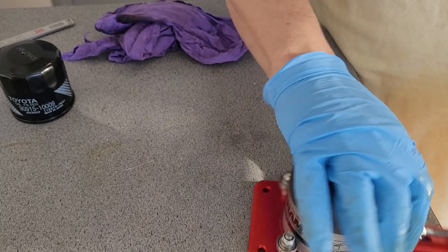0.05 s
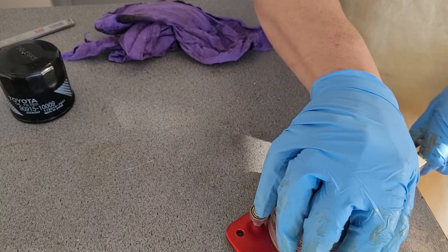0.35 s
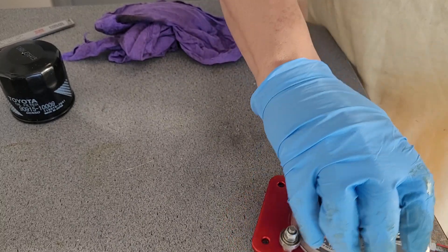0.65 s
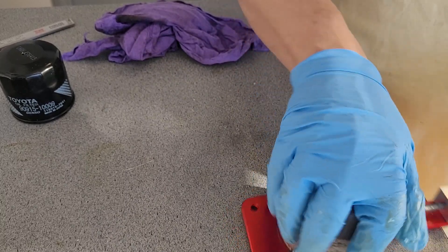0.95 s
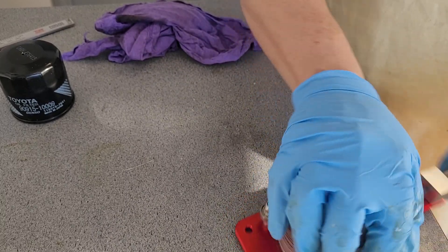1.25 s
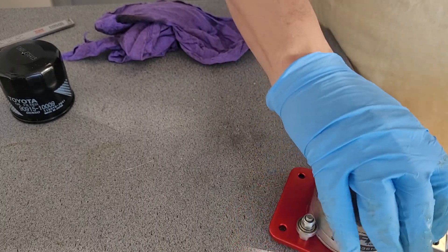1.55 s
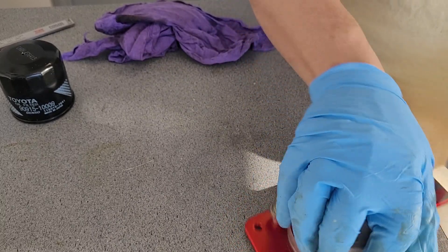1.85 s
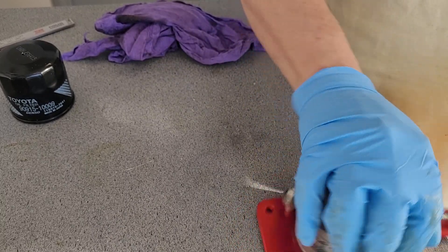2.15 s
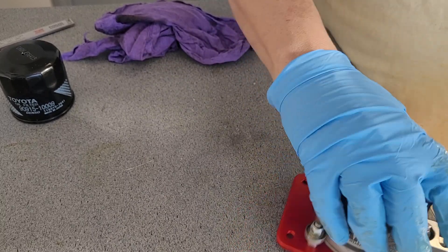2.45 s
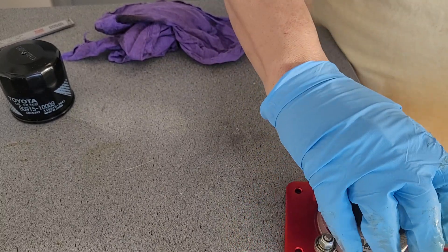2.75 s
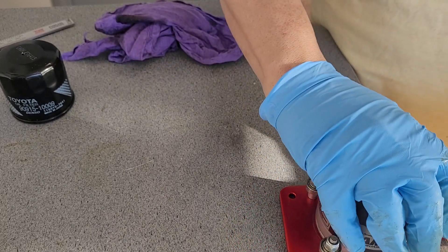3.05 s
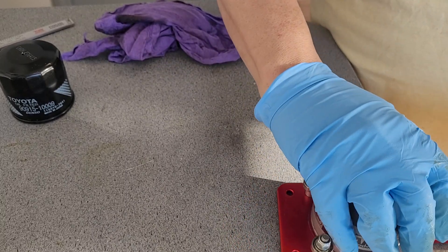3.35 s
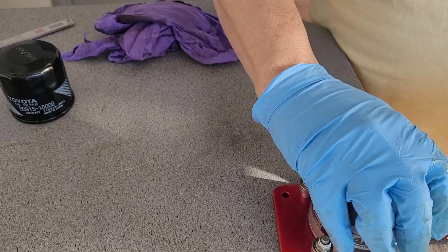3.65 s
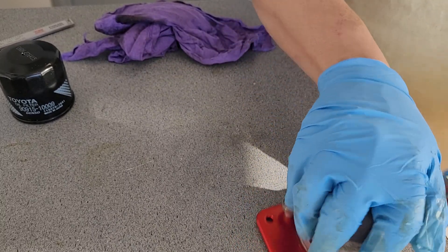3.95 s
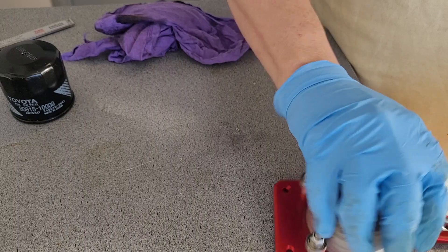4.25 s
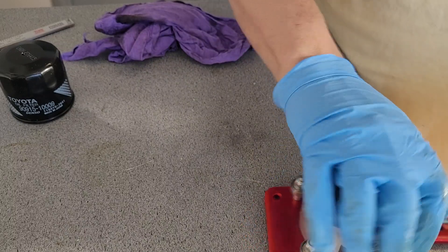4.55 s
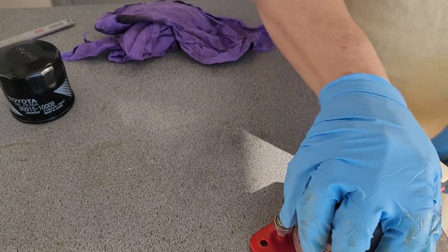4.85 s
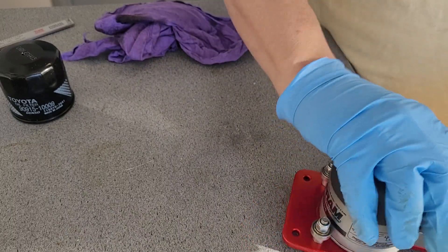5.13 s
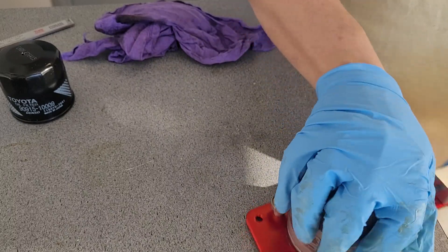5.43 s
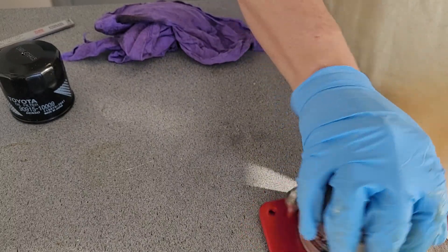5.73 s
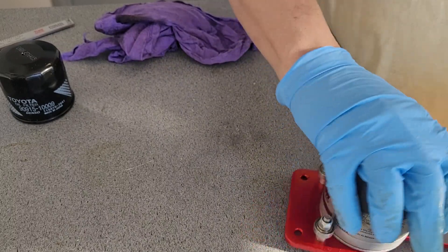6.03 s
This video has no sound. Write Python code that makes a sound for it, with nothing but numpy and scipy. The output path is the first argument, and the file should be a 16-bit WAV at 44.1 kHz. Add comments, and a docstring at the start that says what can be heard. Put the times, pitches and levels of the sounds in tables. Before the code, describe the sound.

From the start, a steel oil filter is twisted against a cutting wheel about twice a second, close by in a small workshop. Each twist makes a short gritty rumble with a light scrape, and the cutter's metal base knocks unevenly on the bench several times a second. Between twists a rubber glove slides back over the can with a dry hiss. A sharp steel tick stands out at about 0.4 seconds, and the hollow can clacks at 0.8. Tiny, faint squeaks come near 0.2, 1.7 and 2.1 seconds. Around 2.7 seconds the turning pauses, leaving a few knocks and a soft, low thud of the hand at 3.2. At about 3.8 the twisting, hissing and knocking resume, with clacks and ticks near 4.4 and 5.4, continuing until about 6 seconds. A faint, steady room hush lies underneath.

```python
"""Oil filter cutter on a workbench

Close up in a small workshop, on a stereo pair: a gloved hand turns a steel oil filter against a
cutter's wheel. Each twist rolls the can with a gritty rumble and rocks the cutter's base, which knocks
on the bench. Between twists the glove hisses back over the can. Loose steel ticks, the can clacks
against the rollers, the wheel squeaks, and once the heel of the hand lands with a soft thud."""
import sys
import numpy as np
from scipy import signal
from scipy.io import wavfile

SR = 44100
rng = np.random.default_rng(int(sys.argv[2]) if len(sys.argv) > 2 else 0)


def transcribe(signal):
    """Save signal, clipped to [-1, 1], as a 16-bit WAV file at the path in sys.argv[1]."""
    frames = np.atleast_2d(signal).T
    limited = np.clip(frames, -1, 1)
    pcm = np.round(limited * 32767).astype(np.int16)
    wavfile.write(sys.argv[1], SR, pcm)


N = 268569


def from_db(db):
    return 10 ** (np.asarray(db) / 20)


def rms_one(x):
    return x / np.sqrt(np.mean(x ** 2) + 1e-20)


def delayed(x, seconds):
    return np.roll(x, round(seconds * SR))


def at_hz(points, hz):
    """The columns of a table, read at one frequency."""
    freqs, *columns = np.transpose(points)
    return [np.interp(np.log(hz), np.log(freqs), c) for c in columns]


def butter(x, hz, kind, order=2):
    sos = signal.butter(order, np.minimum(hz, .48 * SR), kind, fs=SR, output="sos")
    return signal.sosfilt(sos, x + 1e-18)


def drift(per_s):
    """A random wander: straight lines between knots of spread 1."""
    knots = rng.standard_normal(4096)
    return np.interp(np.arange(N) / SR * per_s, np.arange(len(knots)), knots)


def swell(top_s, rise_s, fall_s):
    """One stroke speeding up and slowing down: a lopsided bell of height 1."""
    grid = np.arange(0, N, 32)
    t = grid / SR - top_s
    bell = np.exp(-.5 * (t / np.where(t < 0, rise_s, fall_s)) ** 2)
    return np.interp(np.arange(N), grid, bell)


def ring(hz, db, t60, apart_hz=700, contact_cycles=0.12):
    """One blow on a set of modes; the higher a mode, the more its phase differs left to right."""
    t = np.arange(int(min(t60.max(), .18) * SR))[:, None] / SR
    build_up = 1 - np.exp(-t * hz / contact_cycles)   # the contact lasts part of a cycle
    envelope = from_db(db - 60 * t / t60) * build_up
    phase = (-1) ** np.arange(len(hz)) * hz / (hz + apart_hz)
    return np.array([-(envelope * np.sin(2 * np.pi * hz * t + side * phase)).sum(1) for side in (1, -1)])


def strike(times, strengths_db, modes, detune=0.04):
    """Blows (rows) on modes (columns); the hand's changing grip shifts the modes from blow to blow."""
    hz, db, t60 = np.transpose(modes)
    shifts = np.exp(detune * rng.standard_normal(strengths_db.shape))
    out = np.zeros((2, N + SR))
    for start_s, strength, shift in zip(times, strengths_db, shifts):
        blow = ring(hz * shift, db + strength, t60)
        at = round(start_s * SR)
        out[:, at:at + blow.shape[1]] += blow
    return out[:, :N]


def cracks(times, db, decay_s):
    """Short bursts of noise as two rough faces meet."""
    impulses = np.zeros(N)
    impulses[np.round(times * SR).astype(int)] = from_db(db)
    envelope = signal.lfilter([1], [1, -np.exp(-1 / (decay_s * SR))], impulses + 1e-18)
    return envelope * rng.standard_normal((2, N))


# How alike diffuse sound is at the two microphones: freq_hz, correlation
MIC_LIKENESS = [(60, 0.97), (150, 0.89), (300, 0.37), (640, 0.67), (1400, 0.028), (3000, 0), (16000, 0.047)]
def diffuse_bands(size):
    """Third-octave bands of stereo noise, alike in the bass and unrelated in the treble: (hz, noise)."""
    edges = 28 * 2 ** (np.arange(29) / 3)
    white = rng.standard_normal((2, 2, size + 4000))   # extra samples let the filters settle
    for k, band in enumerate(zip(edges, edges[1:])):
        hz = np.sqrt(band[0] * band[1])
        mid, side = butter(white[k % 2], band, "band")[:, -size:]
        alike = at_hz(MIC_LIKENESS, hz)[0]
        yield hz, np.sqrt((1 + alike) / 2) * mid + np.sqrt((1 - alike) / 2) * side * [[1], [-1]]


def coloured(spectrum, flicker_db=0, flicker_per_s=30):
    """Diffuse noise of a given colour and rms 1; each band can flicker by itself."""
    noise = 0
    for hz, band in diffuse_bands(N):
        flicker = flicker_db * drift(flicker_per_s) if flicker_db else 0
        noise = noise + from_db(at_hz(spectrum, hz)[0] + flicker) * band
    return rms_one(noise)


# Room tone, all around the microphones: freq_hz, density_db
AIR_COLOUR = [(30, -24), (60, -21), (120, -13), (250, -7), (500, -15.5), (1000, -25), (2400, -26.5),
              (5000, -36), (16000, -36.5)]
def room_tone(level_db=-60):
    """The workshop's faint, steady, low rush."""
    return from_db(level_db) * coloured(AIR_COLOUR)


# The small workshop, heard from the bench: freq_hz, level_db, t60_s
ROOM_DECAY = [(59.7, 5.5, 0.71), (134, 5, 0.41), (244, -3.5, 0.36), (515, -3, 0.39), (1120, -4.5, 0.59),
              (2310, -5, 0.36), (4900, -2, 0.36), (8900, 2, 0.36), (15600, -4, 0.24)]
def reflections(x, wet_db=-33, build_s=0.0047, early_db=4, early_s=0.013):
    """Dense early reflections off the bench and body, then a tail that dies band by band."""
    t = np.arange(SR // 2) / SR
    tail = 0
    for hz, band in diffuse_bands(len(t)):
        db, t60 = at_hz(ROOM_DECAY, hz)
        tail = tail + band * from_db(db - 60 * t / t60)
    early_lift = 1 + from_db(early_db) * np.exp(-t / early_s)
    response = tail * (1 - np.exp(-t / build_s)) * early_lift
    return from_db(wet_db) * signal.fftconvolve(x[None], response, axes=1)[:, :N]


# Small squeaks where the wheel meets the can: peak_s, level_db
WHEEL_SQUEAKS = [(0.249, -41), (1.66, -43), (2.132, -37)]
def squeaks(hz=2550, width=0.082, rise_s=0.0017, fall_s=0.0044):
    """The wheel sticks for an instant and sets a narrow resonance of the can's wall chirping."""
    chirp = rms_one(butter(rng.standard_normal((2, N)), [hz / (1 + width), hz * (1 + width)], "band"))
    return chirp * sum(from_db(db) * swell(peak_s, rise_s, fall_s) for peak_s, db in WHEEL_SQUEAKS)


# Hiss of rubber on the can: freq_hz, density_db
GLOVE_COLOUR = [(300, -49), (1000, -12.5), (1900, -4), (3000, -2), (4200, 0.5), (4650, 3.5), (5400, -2.5),
                (7200, -1.5), (8200, -2.5), (9600, -7), (12000, 1), (15500, -8)]
# The glove sliding back, close and dry: top_speed_s, slowing_s, level_db
GLOVE_SLIDES = [(0.064, 0.058, -31.5), (0.507, 0.092, -33), (1.028, 0.057, -34.5), (1.49, 0.056, -32.5),
                (1.95, 0.058, -32), (2.428, .055, -32), (2.809, 0.11, -55), (4.058, 0.07, -34.5),
                (4.572, 0.053, -33), (5.058, 0.063, -33), (5.544, 0.058, -34), (5.998, 0.051, -33.5)]
def glove(hiss_db=-2.0, flutter_db=0.94, drag_db=-10, echo_db=-15, echo_s=0.00072, travel=0.284,
          rise_share=0.59):
    """Thin rubber slips over painted steel and drags the can; a reflection off the bench, its path changing as
    the hand moves, echoes the hiss."""
    speed = sum(from_db(db) * swell(top_s, rise_share * fall_s, fall_s)
                for top_s, fall_s, db in GLOVE_SLIDES)
    hiss = coloured(GLOVE_COLOUR)
    n = np.arange(N)
    lag = echo_s * SR * np.exp(travel * drift(5))
    bench_echo = from_db(echo_db) * np.array([np.interp(n - lag, n, side) for side in hiss])
    hiss_gain = from_db(hiss_db + flutter_db * drift(110))
    drag = from_db(drag_db) * coloured(GRIT_COLOUR)
    return speed * (hiss_gain * (hiss + bench_echo) + drag)


# Modes of the hollow can: pitch_hz, level_db, t60_s
CAN_MODES = [(536, -2, 0.044), (616, -15, 0.029), (806, 4.5, 0.037), (974, -7, 0.043), (1052, 4, 0.031),
             (1345, 9, 0.019), (1690, 0.5, 0.009)]
# The can dropping in the cutter: start_s, level_db
CAN_DROPS = [(0.8366, -32.5), (1.803, -37.5), (2.268, -37.5), (4.3915, -26.5), (4.409, -32),
             (5.3732, -30.5)]
def clacks(scatter_db=2):
    """The hollow can jumps in its seat and drops against the rollers."""
    times, db = np.transpose(CAN_DROPS)
    scatter = scatter_db * rng.standard_normal((len(times), len(CAN_MODES)))
    return strike(times, db[:, None] + scatter, CAN_MODES)


# Modes of the small steel parts: pitch_hz, level_db, t60_s
STEEL_MODES = [(3530, 9, 0.0028), (4130, 14.5, 0.0039), (5540, 7, 0.003), (6300, 0.5, 0.0075),
               (7480, 5, 0.0041), (12900, 8.5, 0.002), (14100, 0, 0.0015), (15000, -3, 0.0027)]
# Metal ticking on metal, near the microphones: start_s, level_db
LOOSE_TICKS = [(.336, -26.5), (.427, -36), (0.4408, -15.5), (0.4419, -13.5), (.83, -32), (1.201, -35),
               (1.299, -33), (1.805, -29), (2.131, -32), (3.2194, -26.5), (4.407, -28), (5.393, -33.5)]
def ticks(ring_db=-9, scatter_db=1.5, crack_db=-2, crack_s=0.0019, jolt_db=-18, jolt_scatter_db=4.3):
    """Loose steel ticks by itself and when a knock jolts it: a short crack and a brief ring."""
    jolts = [(s, db + jolt_db + jolt_scatter_db * rng.standard_normal()) for s, db in BASE_KNOCKS]
    times, db = np.vstack([LOOSE_TICKS, jolts]).T
    scatter = scatter_db * rng.standard_normal((len(times), len(STEEL_MODES)))
    rings = strike(times, db[:, None] + ring_db + scatter, STEEL_MODES)
    return rings + butter(cracks(times, db + crack_db, crack_s), 1300, "high")


# Gritty rumble through the bench: freq_hz, density_db
GRIT_COLOUR = [(35, -18), (65, 0), (100, -7.5), (190, -19), (260, 1), (400, -7.5), (600, -11.5), (900, -17),
               (1400, -21.5), (2400, -18.5), (5000, -45)]
# Steel scraping at the wheel: freq_hz, density_db
SCRAPE_COLOUR = [(500, -7), (1400, -30), (2400, -4), (3400, -5), (4700, 0), (7000, -5.5), (9500, -9),
                 (12500, -2.5), (16000, -10)]
# Twists of the can, close up: top_speed_s, slowing_s, effort_db, pitch_hz
CAN_TWISTS = [(0.319, 0.07, -42, 416), (.815, 0.051, -37.5, 342), (1.261, 0.075, -47.5, 396),
              (1.81, 0.14, -44.5, 780), (2.22, 0.053, -38, 422), (2.5, 0.075, -43.5, 280),
              (3.84, 0.086, -43.5, 338), (4.351, 0.079, -40, 307), (4.821, 0.065, -45.5, 320),
              (5.32, 0.084, -41.5, 328), (5.79, 0.083, -40.5, 325)]
def rolling(burrs_per_s=600, size_db=3.0, judder_db=3, grind_db=-2, grit_db=-2, rasp_db=2.5, width=0.25,
            scrape_db=-50, scrape_follows=0.26):
    """The wheel rides over burrs in its groove: the can grinds, the bench rumbles, the steel scrapes."""
    sizes = from_db(size_db * np.minimum(rng.exponential(1, N), 4)) * rng.choice([-1, 1], N)
    burrs = sizes * (rng.random(N) < burrs_per_s / SR)
    usual_db = np.array(CAN_TWISTS)[:, 2].mean()
    grind = push = rub = 0
    for top_s, fall_s, effort_db, hz in CAN_TWISTS:
        speed = swell(top_s, fall_s, fall_s)
        resonance = rms_one(butter(burrs, [hz / (1 + width), hz * (1 + width)], "band"))
        grind = grind + speed * from_db(effort_db) * resonance
        push = push + speed * from_db(effort_db)
        rub = rub + speed * from_db(scrape_db + scrape_follows * (effort_db - usual_db))
    rumble = from_db(grind_db) * grind + from_db(grit_db) * push * coloured(GRIT_COLOUR)
    scrape = rub * from_db(rasp_db * drift(300)) * coloured(SCRAPE_COLOUR, flicker_db=3.5)
    return rumble * from_db(judder_db * drift(45)) + scrape


# Modes of cutter and bench together, for the thud and the knocks: pitch_hz, level_db, t60_s
BENCH_MODES = [(61, -8, 0.093), (74.8, -5.5, 0.17), (105, -8, 0.12), (138, -14, 0.15), (156.7, -7, 0.088),
               (197, -23, 0.013), (255, -3.5, 0.074), (273, -2, 0.2), (350, -4, 0.075), (408, -2.5, 0.058),
               (414, 4, 0.027), (574.4, 7.5, 0.022), (709, 2, 0.025), (811, -17, 0.085), (967, -9.5, 0.06),
               (1280, -22, 0.082), (1363, 3, 0.016), (1712, -4.5, 0.045), (2005, 2, 0.012),
               (2154, -11, 0.035), (2382, 0.5, 0.017), (2580, -11, 0.017), (4110, -2, 0.0061),
               (4830, -28, 0.0038), (7000, -34.5, 0.013)]
def thud(start_s=3.24, level_db=-7, softness_db_per_octave=5.0, damped_t60_s=0.082, soft_hz=520,
         count=13):
    """The heel of the hand lands softly on the cutter: it sways and damps the bench's low modes."""
    pivot_hz = BENCH_MODES[1][0]
    modes = [(hz, db - softness_db_per_octave * np.log2(hz / pivot_hz), min(t60, damped_t60_s))
             for hz, db, t60 in BENCH_MODES[:count]]
    sway = strike([start_s], np.full((1, count), level_db), modes)
    return butter(sway, soft_hz, "low", order=4)


def wobbles(per_twist=2, above_effort_db=6.5, spread_s=.04):
    """The base stirs in faint knocks around each twist's top speed: (start_s, level_db)."""
    top_s, _, effort_db, _ = np.repeat(CAN_TWISTS, per_twist, axis=0).T
    times = np.clip(top_s + spread_s * rng.standard_normal(len(top_s)), 0, (N - 1) / SR)
    return np.transpose([times, effort_db + above_effort_db])


def second_feet(lag_s=0.00402, gain_db=-11):
    """The base never lands flat, so its other foot follows each knock: (start_s, level_db)."""
    return [(s + lag_s * rng.uniform(0.502, 2), db + gain_db) for s, db in BASE_KNOCKS]


# The cutter's base landing on the bench, right by the microphones: start_s, level_db
BASE_KNOCKS = [(.043, -27.5), (0.0791, -18.5), (.151, -26.5), (0.2842, -20.5), (.335, -27), (0.4539, -17),
               (.7128, -16), (.7743, -26.5), (.836, -26), (.905, -31), (1.1478, -18), (1.201, -31),
               (1.2996, -28.5), (1.39, -23.5), (1.6233, -22.5), (1.6935, -17.5), (1.851, -29),
               (1.9714, -15.5), (2.141, -24.5), (2.396, -22.5), (2.556, -24), (3.135, -21.5),
               (3.3235, -19.5), (3.351, -29), (3.877, -31), (3.9348, -23.5), (4.2199, -22), (4.3919, -18.5),
               (4.4803, -16), (4.6711, -23), (4.8634, -29), (4.963, -24), (5.2055, -18), (5.271, -25.5),
               (5.3745, -27), (5.441, -22), (5.6817, -18.5), (5.7235, -28.5), (5.894, -30)]
def knocks(body_db=-7, thump_db=-2.44, hard_db=-1, scatter_db=2.13, usual_db=-24.5, hardening=0.43,
           rattle_db=-10.5, rattle_s=0.04, rattle_hz=2700, snap_db=-10, snap_hz=5000,
           bounce_s=.038, bounce_db=-9, bounce_hz=400):
    """The bench thumps and the plate rings; the base snaps, rattles and settles with a soft bounce."""
    times, db = np.vstack([BASE_KNOCKS, second_feet(), wobbles()]).T
    hardness_db = hardening * (db - usual_db)   # stronger blows are brighter
    hz = np.array(BENCH_MODES)[:, 0]
    low_share = np.clip(np.log2(200 / hz), 0, 1)
    high_share = np.clip(np.log2(hz / 480), 0, 1)
    strengths = db[:, None] + thump_db * low_share + np.outer(hardness_db + hard_db, high_share)
    body = strike(times, strengths + scatter_db * rng.standard_normal(strengths.shape), BENCH_MODES)
    rattle = cracks(times, db + hardness_db + rattle_db, rattle_s)
    rattle = butter(butter(rattle, rattle_hz, "low", order=4), 330, "high")
    snap = butter(cracks(times, db + hardness_db + snap_db, decay_s=0.0031), snap_hz, "low")
    bounce = delayed(body.mean(0), bounce_s)
    bounce = butter(butter(bounce, bounce_hz, "low"), 233, "high")
    return from_db(body_db) * (body + from_db(bounce_db) * bounce) + rattle + snap


def scene(thud_room_db=-7, left_lag_s=.00009):
    """The cutter stands close, a little nearer the right microphone; the thud stirs the room less."""
    cutter = knocks() + clacks() + ticks() + rolling() + squeaks()
    hand = thud()
    left, right = cutter + hand
    direct = np.array([delayed(left, left_lag_s), right])
    room = reflections((cutter + from_db(thud_room_db) * hand).mean(0))
    return direct + room + glove() + room_tone()


def record(dry, low_cut_hz=52.0, high_cut_hz=16000):
    """The microphones lose the deepest bass; the top is cut steeply."""
    thin = butter(dry, low_cut_hz, "high", order=4)
    return signal.sosfilt(signal.ellip(10, .2, 70, high_cut_hz, fs=SR, output="sos"), thin)


dry = scene()
out = record(dry)
transcribe(out)
```